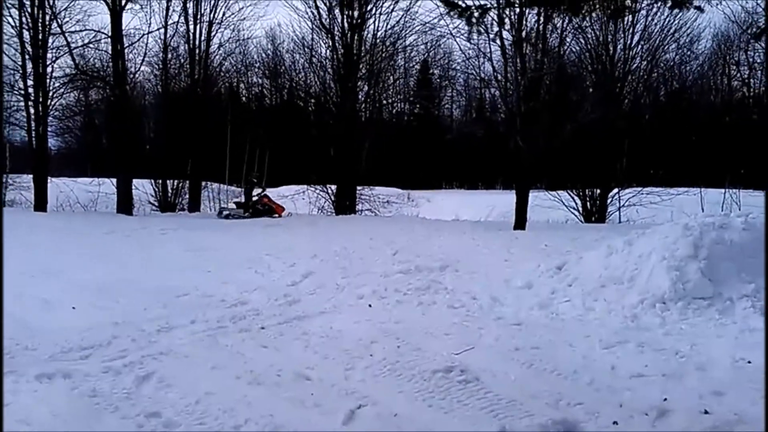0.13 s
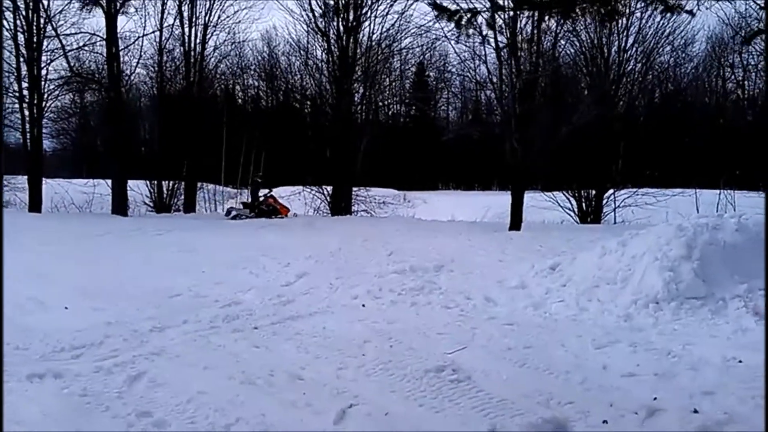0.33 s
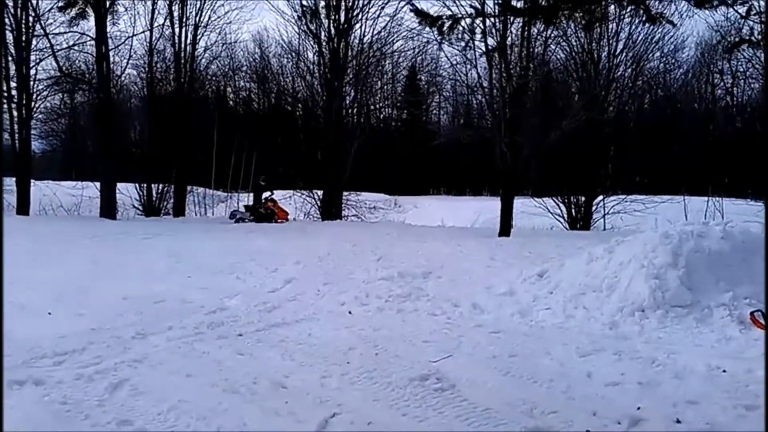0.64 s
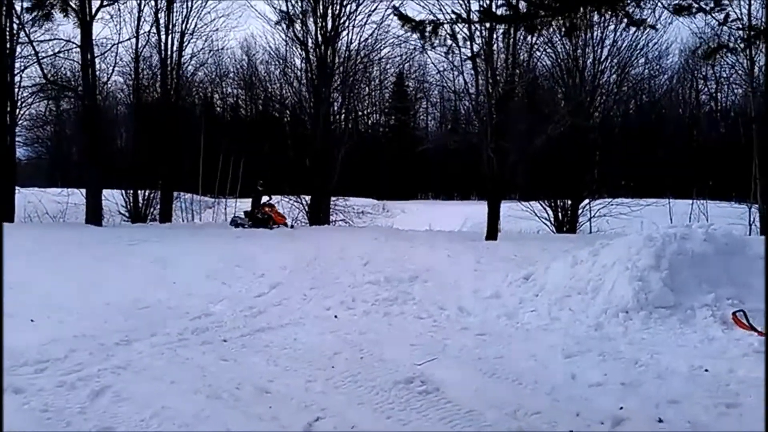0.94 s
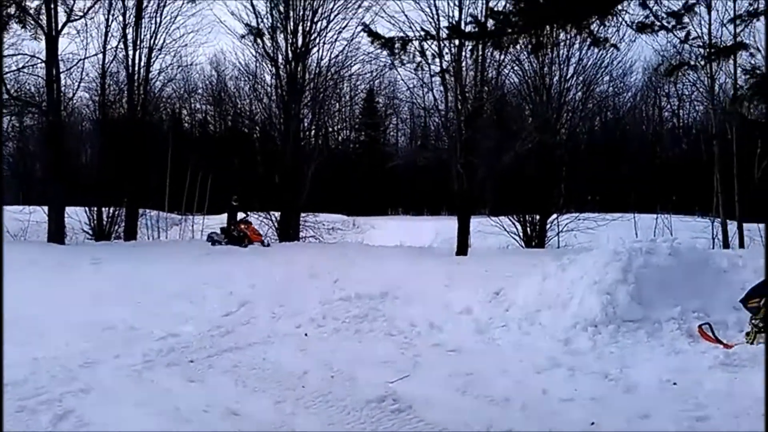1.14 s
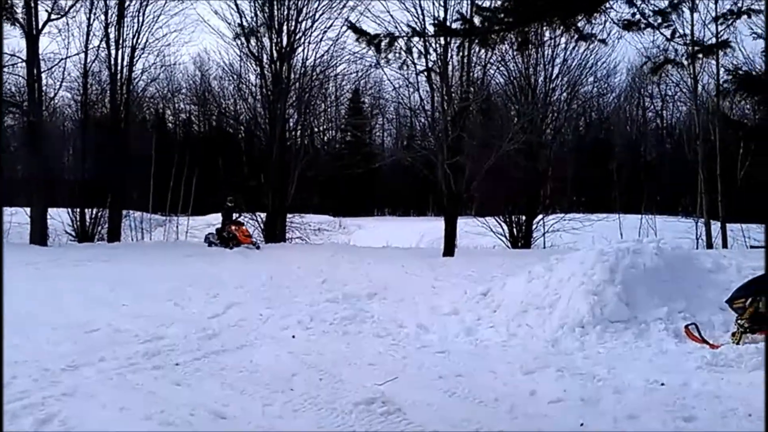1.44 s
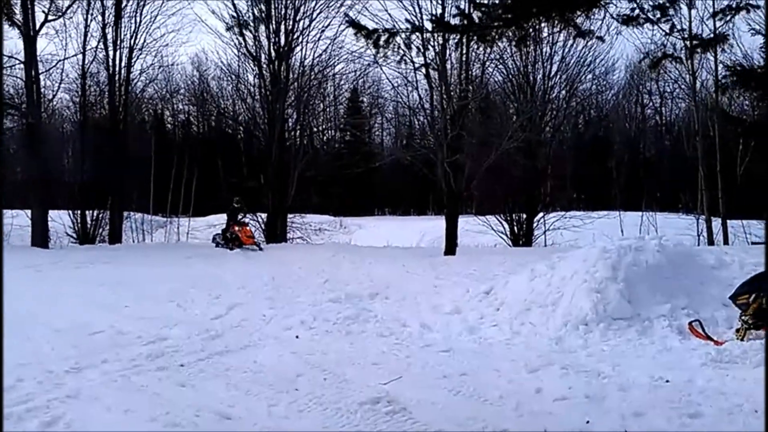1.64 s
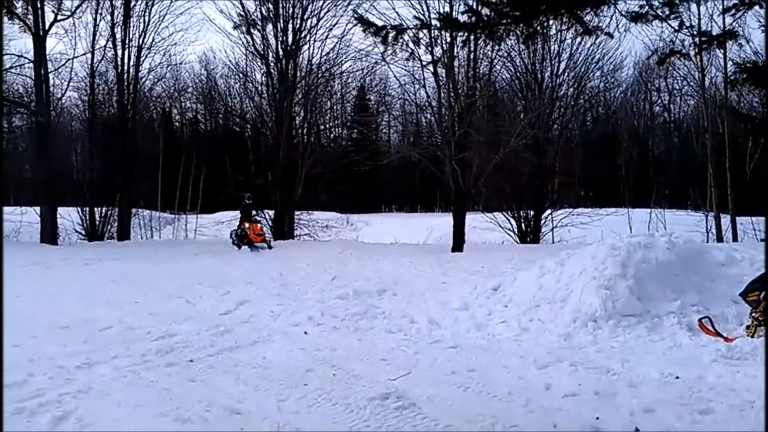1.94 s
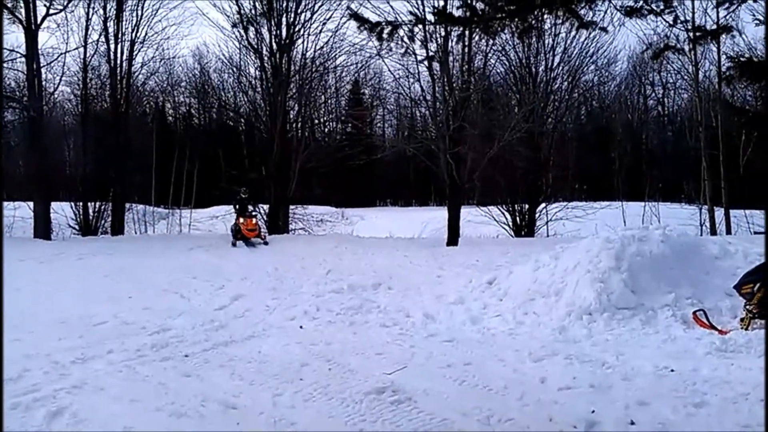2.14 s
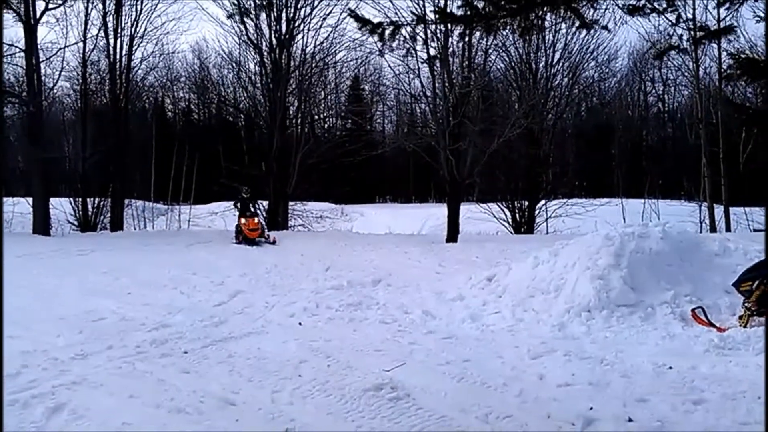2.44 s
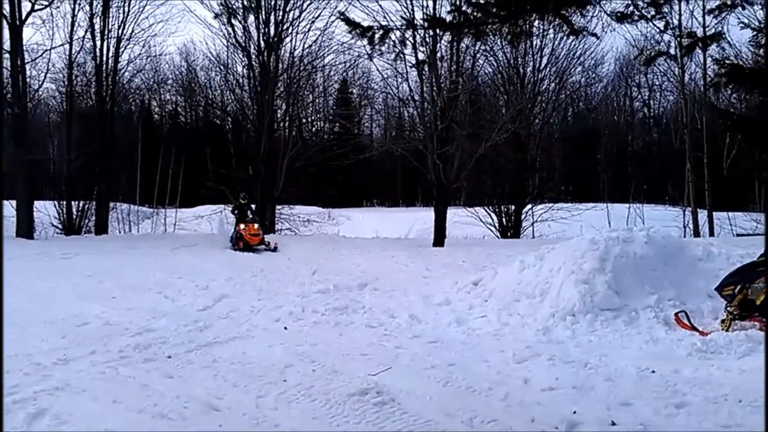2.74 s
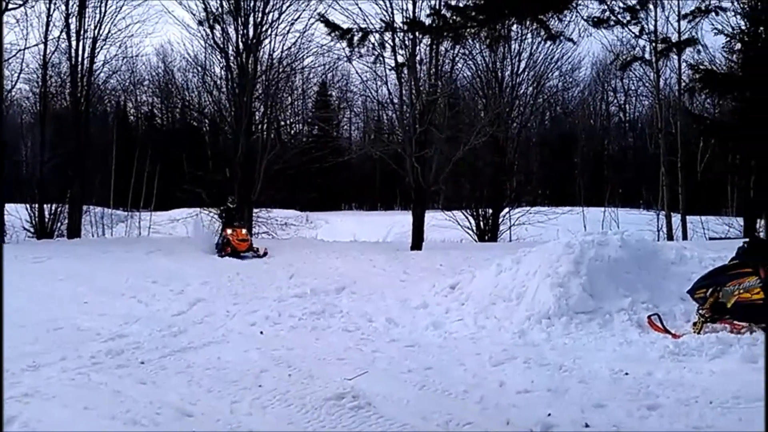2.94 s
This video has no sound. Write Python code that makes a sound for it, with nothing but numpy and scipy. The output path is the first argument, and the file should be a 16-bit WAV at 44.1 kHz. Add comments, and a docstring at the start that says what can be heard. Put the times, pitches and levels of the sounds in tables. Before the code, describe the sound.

A distant two-stroke snowmobile blips its throttle over the steady rush of its track on snow, with bursts at the start and near 0.6, 1.5 and 2.1 seconds. Close by, crusted snow snaps, crunches and thuds, mostly at 0.6 to 0.8 seconds. From 2.1 seconds the raspy exhaust whines under load, echoing faintly off trees, and from 2.5 seconds it climbs steadily in pitch. The microphone sounds boxy.

```python
"""A two-stroke snowmobile runs at the far edge of a snowy field, blipping its throttle; its track rushes
over the snow and the trees answer its exhaust. Close by, crusted snow snaps, crunches and thuds as under
boots, most at 0.6-0.8 s. From 2.1 s the exhaust whines under load; from 2.5 s the machine pulls away
with rising pitch. Throughout, the microphone sounds boxy, strongest at 1-2 kHz, and its limiter holds
down the highest peaks."""
import sys
import numpy as np
from scipy import signal
from scipy.fft import rfft, irfft, next_fast_len
from scipy.io import wavfile
from scipy.ndimage import uniform_filter1d, minimum_filter1d, map_coordinates

SR = 44100
rng = np.random.default_rng(int(sys.argv[2]) if len(sys.argv) > 2 else 0)


def unload_audio(sound):
    """Save the sound as a 16-bit wav file, at the path given as the first command line argument."""
    columns = np.transpose(np.atleast_2d(sound))
    # keep every value between -1 and 1, then stretch to whole-number steps
    steps = np.round(np.clip(columns, -1, 1) * 32767)
    wavfile.write(sys.argv[1], SR, steps.astype(np.int16))


N = 136710
T = np.arange(N) / SR


def amp(db):
    """Decibels to gain."""
    return 10 ** (np.asarray(db) / 20)


def unit(x):
    """Scale to rms 1."""
    return x / np.sqrt(np.mean(x ** 2) + 1e-20)


def at_hz(points, hz):
    """Interpolate (freq_hz, value) points on a log axis."""
    freqs_hz, values = np.transpose(points)
    return np.interp(np.log(hz + 1), np.log(freqs_hz + 1), values)


def curve(points):
    """Interpolate (time_s, value) points per sample."""
    return np.interp(T, *np.transpose(points))


def wobble(knots_per_s):
    """Smooth random curve, rms near 1."""
    return map_coordinates(rng.standard_normal(int(N * knots_per_s / SR) + 4), [T * knots_per_s])


def noise():
    """Two independent white noises."""
    return rng.standard_normal((2, N))


def swell(start_s, rise_s, hold_s, release_s, span_db=18.5):
    """Gain that rises, holds at 1 and dies; span_db per rise or release time."""
    before = np.maximum((start_s + rise_s - T) / rise_s, 0)
    after = np.maximum((T - start_s - rise_s - hold_s) / release_s, 0)
    return amp(-span_db * (before + after))


def microphone(pair, tilt):
    """Colour a direct and a diffuse signal causally and spread them over both ports, at rms 1."""
    # boxy response: freq_hz, gain_db
    response = [(35, -78), (60, -51), (145, -43), (237, -35.5), (294, -26), (349, -19.5), (389, -22),
                (433, -17), (482, -15.5), (560, -15), (807, -4), (899, -10.5), (1070, 0.5), (1190, -0.5),
                (1640, -3.5), (1870, 1.5), (2810, -23.5), (3190, -21), (3400, -27), (4800, -25),
                (6620, -30.5), (7070, -40), (7700, -24), (8390, -22.5), (10200, -45), (11000, -61.5),
                (12200, -77), (22000, -120)]
    # housing resonances: centre_hz, width_hz, gain_db
    housing = [(683, 58, 2), (1233.6, 46, 5.5), (1890, 140, 1.5), (2680, 65, -0.5), (3197, 41, 3),
               (3580, 170, 6), (4170, 88, 7), (5270, 25, -11.5)]
    # likeness of left and right: freq_hz, coherence
    likeness = [(60, 0.24), (110, 0.2), (190, 0.47), (330, 0.67), (580, 0.78), (1010, 0.92), (1780, 0.84),
                (3140, 0.47), (5530, 0.38), (9730, 0.26)]
    # stereo balance: freq_hz, left_minus_right_db
    balance = [(200, 2.5), (700, 4), (1100, 5), (1400, 2), (1900, 5.5), (2500, 5), (3300, -1.5),
               (5000, -3.5), (7000, -7), (8500, -8.5), (10000, -8.5)]
    size = 2 * next_fast_len(N)
    hz = np.fft.rfftfreq(size, 1 / SR)
    housing_db = sum(db / (1 + (2 * (hz - centre_hz) / width_hz) ** 2)
                     for centre_hz, width_hz, db in housing)
    cepstrum = irfft(np.log(amp(at_hz(response, hz) + housing_db + at_hz(tilt, hz))))
    causal = np.r_[1, np.full(size // 2 - 1, 2), np.zeros(size // 2)]
    colour = np.exp(rfft(cepstrum * causal))  # minimum phase
    spread_rad = np.arccos(np.clip(at_hz(likeness, hz), 0, 1)) / 2
    mid, side = rfft(pair, size) * colour * [np.cos(spread_rad), np.sin(spread_rad)]
    lean = amp(at_hz(balance, hz) / 2)
    return unit(irfft([(mid + side) * lean, (mid - side) / lean], size)[:, :N])


def crankshaft():
    """Speed in turns a second and turns completed, per sample."""
    # crankshaft speed: time_s, speed_hz
    speeds = [(0, 78), (.3, 73), (.7, 78), (1.15, 76), (1.38, 73), (1.46, 71), (1.54, 66), (1.65, 81),
              (1.85, 73), (2.0, 72), (2.09, 66), (2.15, 75.1), (2.2, 80.2), (2.244, 79.3), (2.378, 74.4),
              (2.438, 75.3), (2.498, 78), (2.56, 83.4), (2.64, 91), (2.75, 99), (2.878, 108.6),
              (2.938, 111.9), (2.998, 114.2), (3.1, 116.3)]
    speed_hz = curve(speeds)
    return speed_hz, np.cumsum(speed_hz) / SR


def exhaust_rasp():
    """Two unequal cylinders fire once a turn each: sharp pulses, echoed by trees, and puffs of gas."""
    # rasp envelope: time_s, level_db
    levels = [(0, -73), (1.3, -45), (1.6, -29.5), (1.95, -47.5), (2.1, -25.5), (2.2, -27), (2.32, -31),
              (2.42, -30), (2.52, -25.5), (2.62, -26), (2.7, -25.5), (2.8, -28.5), (2.92, -26.5),
              (3.1, -28.5)]
    # pulse colour: freq_hz, gain_db
    pulse_tilt = [(100, -44), (250, 0), (450, -6), (750, -6), (1100, 1.5), (1500, 5), (1900, 4.5),
                  (2400, 0.5), (3500, -2.5), (6000, -17.5), (9000, -20.5)]
    # gas colour: freq_hz, gain_db
    gas_tilt = [(150, -38), (400, -22), (900, -2.5), (2000, -1.5), (2600, 8), (3200, 7.5), (4500, 6),
                (8500, 5.5)]
    weak_gain, scatter_db, jitter_s = 0.3, 2, .00004
    echo_db, gas_db = 3, -6.5
    _, turns = crankshaft()
    firing = np.arange(1, int(2 * turns[-1]))
    timing, strength = rng.standard_normal((len(firing), 2)).T
    at_sample = (np.interp(firing / 2, turns, T) + jitter_s * timing) * SR
    sizes = np.where(firing % 2, weak_gain, 1) * amp(scatter_db * strength)
    taps = at_sample.astype(int)[:, None] + np.arange(-8, 9)
    kernels = sizes[:, None] * np.sinc(taps - at_sample[:, None])  # pulses fall between samples
    pulses = unit(np.bincount(np.clip(taps, 0, N - 1).ravel(), kernels.ravel(), N))
    echo = trees(pulses)
    rasp = microphone([unit(pulses + amp(echo_db) * echo[0]), echo[1]], pulse_tilt)
    puffs = amp(0.65 * np.cos(4 * np.pi * turns) + np.cos(2 * np.pi * turns))
    gas = microphone(noise() * puffs, gas_tilt)
    return amp(curve(levels) + 0.36 * wobble(25.5)) * (rasp + amp(gas_db) * gas)


def pipe_note():
    """Low engine orders, shaped by the exhaust pipe."""
    # note envelope: time_s, level_db
    levels = [(0, -64), (1.4, -81), (1.6, -53.5), (1.75, -78), (2.05, -52.5), (2.16, -44), (2.27, -78),
              (2.4, -58.5), (2.53, -47), (2.6, -57.5), (2.68, -40), (2.76, -38), (2.83, -52), (3.1, -52.5)]
    # partials: crank_order, level_db
    orders = [(2, -1.5), (4, 3), (5, -1), (6, -7.5)]
    # pipe response: freq_hz, gain_db
    pipe = [(120, -50), (190, -37.5), (222, -5), (300, 4.5), (390, -4), (490, 4), (700, -25)]
    speed_hz, turns = crankshaft()
    note = np.zeros(N)
    for order, db in orders:
        gain = amp(db + at_hz(pipe, order * speed_hz) + 2.2 * wobble(20))
        note += gain * np.sin(2 * np.pi * order * turns + .2 * wobble(30.04))
    return amp(curve(levels) + [[2], [-2]]) * unit(note)  # leans left


def exhaust_whine():
    """Under load the firing turns even and its overtones stand out as clean lines."""
    # whine envelope: time_s, level_db
    levels = [(0, -64.5), (2.05, -51), (2.2, -26.5), (2.33, -37.5), (2.48, -34.5), (2.6, -32.5),
              (2.7, -26.5), (2.85, -31.5), (2.95, -36), (3.1, -33)]
    # partials: crank_order, level_db
    orders = [(6, -5), (7, -2), (8, -10), (9, -4), (10, 3), (11, 1), (12, 1), (13, -9), (14, 0), (15, -6),
              (16, 0), (17, 0), (18, -2), (19, 0), (20, -9), (21, -8), (22, -5), (23, -7)]
    # whine colour: freq_hz, gain_db
    tilt = [(500, -18), (700, -7.5), (810, -4.5), (940, -9), (1060, 2.5), (1220, 6.5), (1350, -4),
            (1550, -7), (1850, -5.5), (2150, 2.5), (2350, -3), (2700, 11)]
    flicker_db, smear_rad = 4.5, .26
    speed_hz, turns = crankshaft()
    tone = np.zeros(N)
    for order, db in orders:
        gain = amp(db + at_hz(tilt, order * speed_hz) + flicker_db * wobble(6.84))
        tone += gain * np.sin(2 * np.pi * (order * turns + rng.random()) + smear_rad * wobble(45))
    return amp(curve(levels) + [[2], [-2]]) * unit(tone)  # leans left


def throttle_blips():
    """With the throttle open the engine roars, gulping air once a turn, and its airbox rings."""
    # throttle openings: start_s, rise_s, hold_s, release_s, level_db, ring_re_roar_db
    blips = [(-.03, 0.019, 0.019, 0.076, -29.5, -2), (0.052, 0.0089, 0.015, 0.045, -35, -15),
             (0.597, 0.071, 0.074, 0.094, -24, 0), (0.761, 0.028, .012, 0.054, -27, 0),
             (1.465, 0.023, 0.0083, .05, -25, -14), (1.493, 0.027, 0.11, 0.053, -21, -10),
             (2.008, 0.051, 0.019, 0.08, -22.5, -14.5), (2.106, 0.044, 0.017, 0.027, -18, 0),
             (2.436, 0.036, 0.011, 0.066, -27.5, -6), (2.733, 0.03, 0.02, 0.026, -25.5, -7.5)]
    # roar colour: freq_hz, gain_db
    roar_tilt = [(100, -21), (250, -4), (600, -2), (1000, 2.5), (1250, 4), (1550, 8), (1950, -.5),
                 (2400, 7), (3500, 5), (6000, 4), (8300, 1.5), (10000, 4.5)]
    # airbox resonances: freq_hz, gain_db
    airbox = [(100, -51), (1000, -32), (1220, -14.5), (1400, -30.5), (1750, -16), (1930, -6.5),
              (2100, -6.5), (3000, -46.5), (9000, -39)]
    gulp_db = 2.2
    _, turns = crankshaft()
    roar_power, ring_power = np.zeros(N), np.zeros(N)
    for *timing_s, db, ring_db in blips:
        power = (amp(db) * swell(*timing_s)) ** 2
        roar_power += power
        ring_power += power * amp(ring_db) ** 2
    gulps = amp(gulp_db * np.cos(2 * np.pi * turns))
    roar = np.sqrt(roar_power) * microphone(noise() * gulps, roar_tilt)
    ring = np.sqrt(ring_power) * microphone(noise() * gulps, airbox)
    return roar + ring


def track_rush():
    """The rubber track rushes unevenly over snow."""
    # rush envelope: time_s, level_db
    levels = [(0, -34), (.2, -38.5), (.55, -38.5), (.9, -35.5), (1.05, -36), (1.35, -39), (1.75, -39.5),
              (1.92, -37.5), (2.25, -42.5), (2.6, -43.5), (3.1, -40)]
    # rush colour: freq_hz, gain_db
    tilt = [(100, -10), (200, 16.5), (450, 8.5), (750, 7), (1200, 3), (1900, 1.5), (2800, 11), (4200, 15),
            (6000, 9.5), (8300, 6.5), (10000, 13.5)]
    sway_db = 1.1 * wobble(20) + 1.2 * wobble(130)
    return amp(curve(levels) + sway_db) * microphone(noise(), tilt)


def snow_crunches():
    """Snow gives way in dense, bright grains over a hiss of powder."""
    # near crunches: start_s, rise_s, hold_s, release_s, level_db
    crunches = [(0.574, 0.09, 0.11, .07, -31), (1.059, 0.014, 0.042, 0.054, -33.5)]
    # crunch colour: freq_hz, gain_db
    tilt = [(100, -7), (300, 3), (750, 6), (1100, -5), (1900, 0.5), (2600, 7.5), (3800, 15.5), (6000, 10),
            (8300, 8), (10300, 19)]
    grains_per_s, spread_db, powder_db = 1600, 4, -3
    envelope = sum(amp(db) * swell(*timing_s) for *timing_s, db in crunches)
    sizes = amp(spread_db * np.minimum(rng.exponential(size=(2, N)), 4))
    breaks = rng.random((2, N)) < grains_per_s / SR
    grains = unit(breaks * sizes * np.sign(noise()))
    return envelope * microphone(grains + amp(powder_db) * noise(), tilt)


def snow_thuds():
    """Snow packs down: short hollow knocks with a low scuff."""
    # knocks: peak_s, rise_s, t60_s, level_db, left_minus_right_db
    thuds = [(0.619, 0.011, 0.062, -37.5, -12), (0.638, 0.007, 0.1, -36, -20),
             (.665, 0.0057, 0.078, -31, -3), (.684, 0.0035, 0.16, -35, -17),
             (.704, 0.0069, 0.015, -19.5, -23.5), (0.722, 0.0064, 0.2, -36, -7.5),
             (1.079, 0.0032, 0.17, -46.5, 1), (1.481, 0.0071, 0.16, -41.5, 1.5), (1.55, 0.046, .3, -45, 2),
             (1.921, 0.057, 0.39, -43.5, -13), (2.014, 0.0052, 0.76, -44.5, 2)]
    # scuff colour: freq_hz, gain_db
    tilt = [(60, -8), (170, 13), (280, 24), (450, 13), (750, -4), (1200, -21), (4000, -34)]
    ring_hz, ring_gain = 289, 0.26
    scuff = microphone(noise(), tilt)
    out = np.zeros((2, N))
    for peak_s, rise_s, t60_s, db, lean_db in thuds:
        age_s = T - peak_s
        envelope = np.clip(age_s / rise_s + 1, 0, 1) * amp(-60 * np.maximum(age_s, 0) / t60_s)
        ring = ring_gain * np.sin(2 * np.pi * ring_hz * age_s)
        out += amp([[db + lean_db / 2], [db - lean_db / 2]]) * envelope * (scuff + ring)
    return out


def crust_snaps():
    """Icy crust cracks: the treble arrives first, and a long crack sinks into a thump."""
    # falling chirps: start_s, level_db, from_hz, toward_hz, glide_tau_s, length_s
    snaps = [(.055, -26, 3800, 500, .002, .005), (.0703, -26, 3700, 400, .0021, .005),
             (.695, -22, 1000, 235, .003, .019), (1.077, -30, 3500, 600, .002, .006)]
    out = np.zeros(N)
    for start_s, db, from_hz, toward_hz, tau_s, length_s in snaps:
        age_s = np.clip(T - start_s, 0, length_s)
        cycles = toward_hz * age_s + (from_hz - toward_hz) * tau_s * (1 - np.exp(-age_s / tau_s))
        out += amp(db) * np.sin(np.pi * age_s / length_s) * np.sin(2 * np.pi * cycles)
    return out


def trees(x):
    """Two diffuse answers from the forest edge; the treble dies first."""
    # echo decay: freq_hz, t60_s
    decay = [(200, 0.22), (2000, 0.26), (9000, 0.064)]
    hz, age_s, spectra = signal.stft(rng.standard_normal((2, SR // 2)), SR, nperseg=256)
    fade = amp(-60 * age_s / at_hz(decay, hz)[:, None])
    _, tail = signal.istft(spectra * fade, SR, nperseg=256)
    return signal.fftconvolve(x[None], tail / np.linalg.norm(tail[0]), axes=1)[:, :N]


def scene():
    """The far machine and the near snow."""
    machine = exhaust_rasp() + pipe_note() + exhaust_whine() + throttle_blips() + track_rush()
    return machine + snow_crunches() + snow_thuds() + crust_snaps()


def record(dry):
    """Fast peak limiter, then a brick-wall low-pass."""
    ceiling, window_s, top_hz = 0.28, .0012, 15200
    window = int(window_s * SR)
    needed_gain = ceiling / np.maximum(np.abs(dry), ceiling)
    limited = dry * uniform_filter1d(minimum_filter1d(needed_gain, window), window)
    size = next_fast_len(N + SR // 2)
    passband = np.fft.rfftfreq(size, 1 / SR) < top_hz
    return irfft(rfft(limited, size) * passband, size)[:, :N]


dry = scene()
out = record(dry)
unload_audio(out)
```